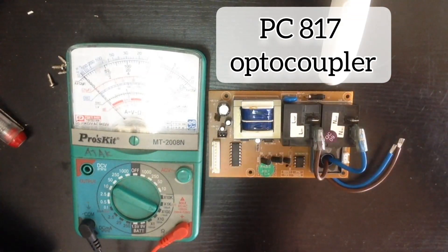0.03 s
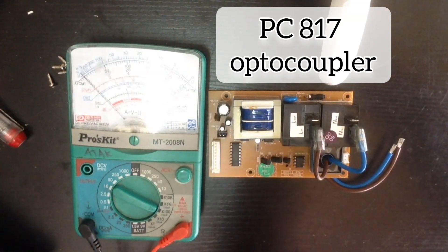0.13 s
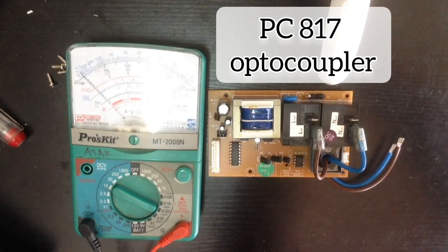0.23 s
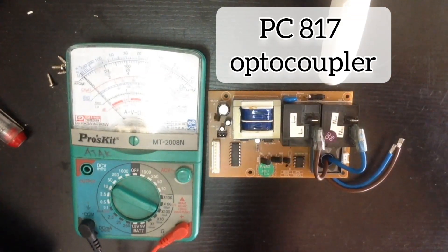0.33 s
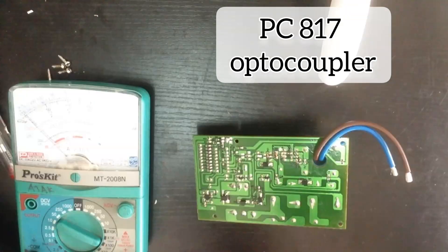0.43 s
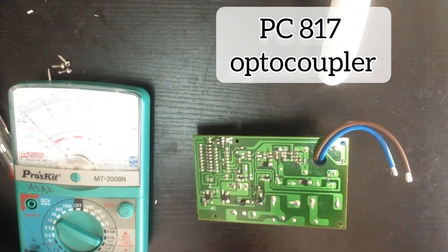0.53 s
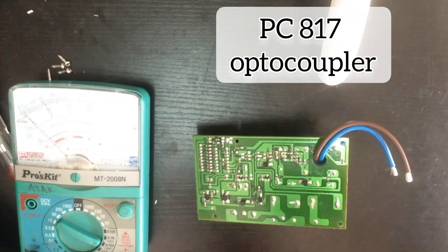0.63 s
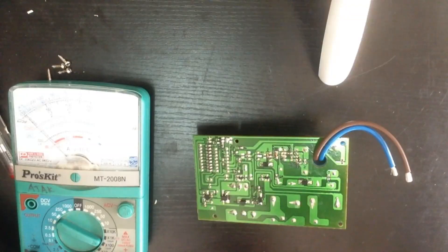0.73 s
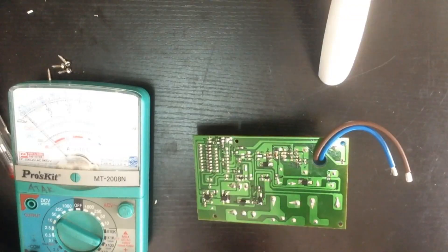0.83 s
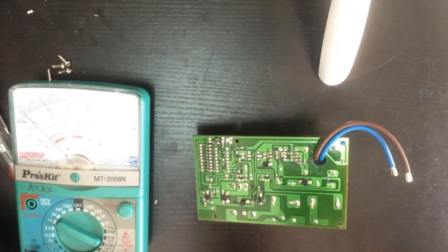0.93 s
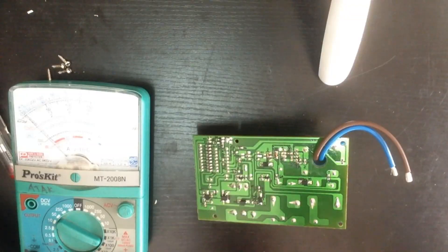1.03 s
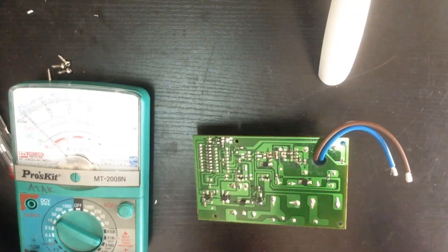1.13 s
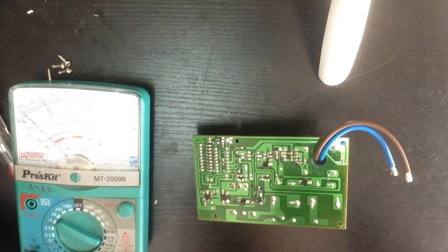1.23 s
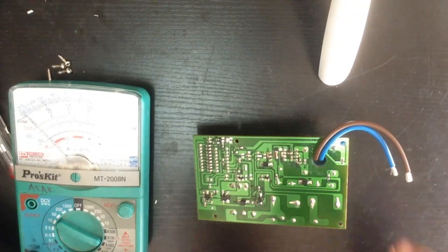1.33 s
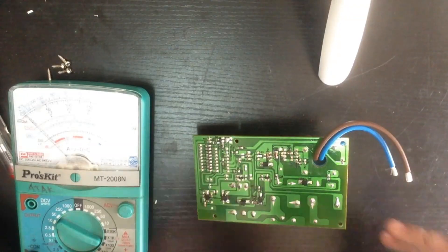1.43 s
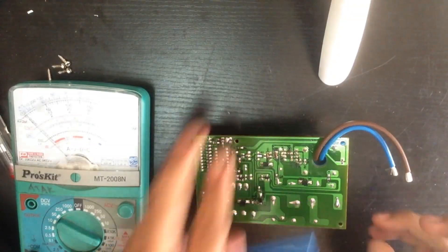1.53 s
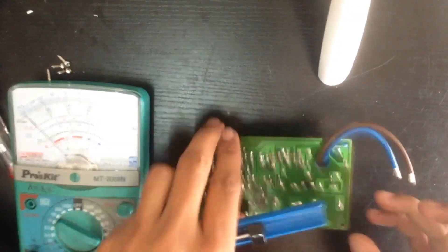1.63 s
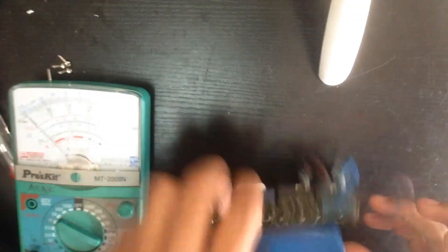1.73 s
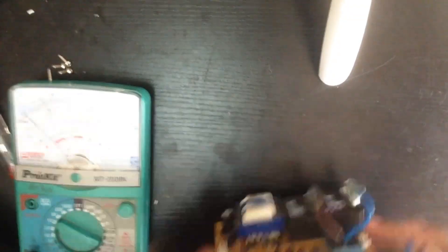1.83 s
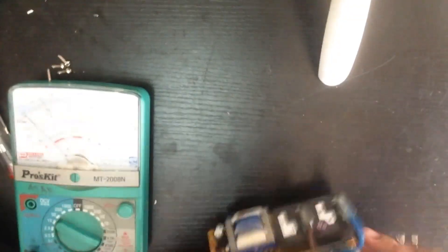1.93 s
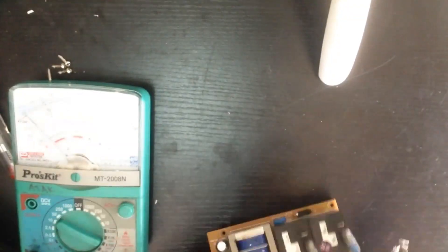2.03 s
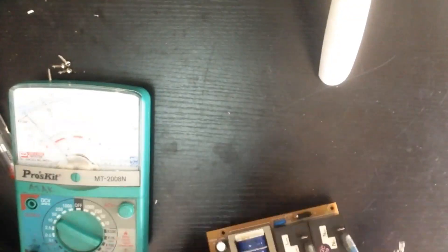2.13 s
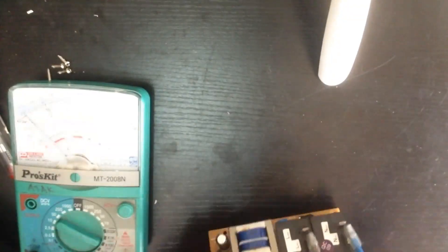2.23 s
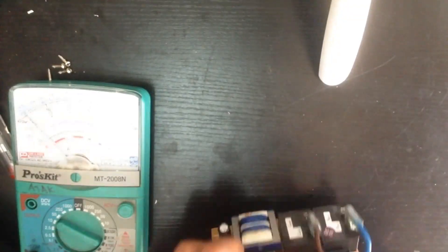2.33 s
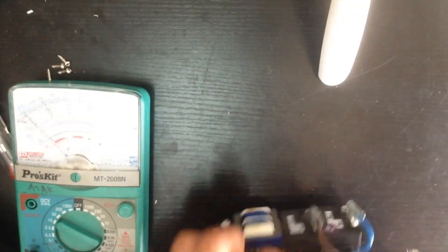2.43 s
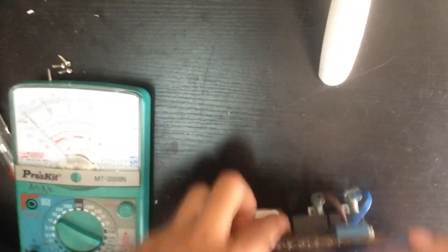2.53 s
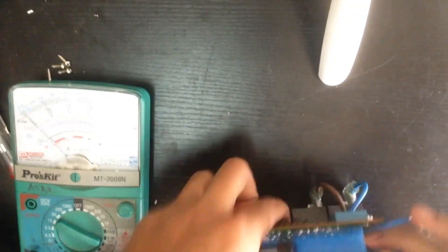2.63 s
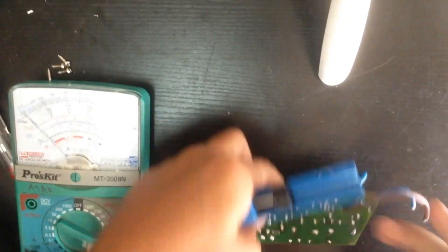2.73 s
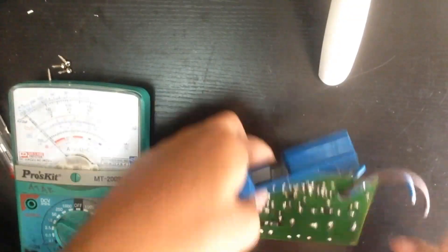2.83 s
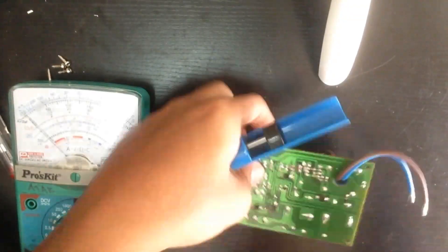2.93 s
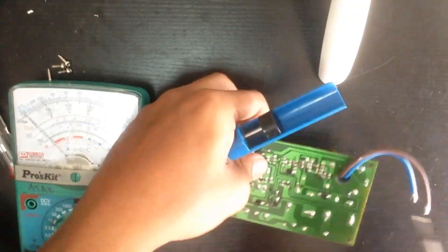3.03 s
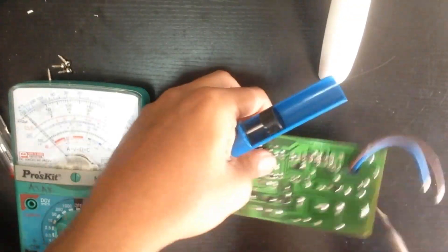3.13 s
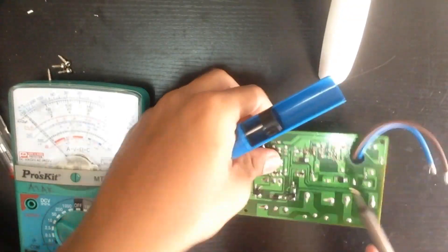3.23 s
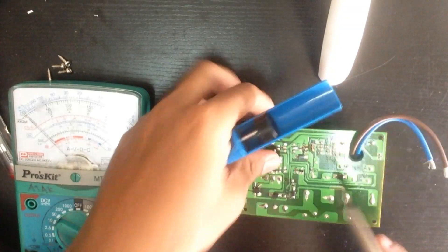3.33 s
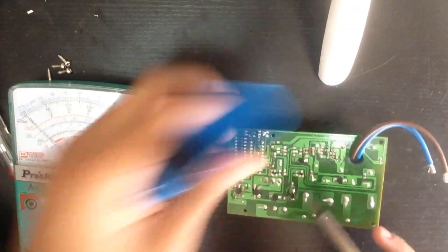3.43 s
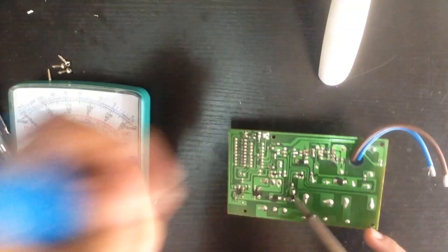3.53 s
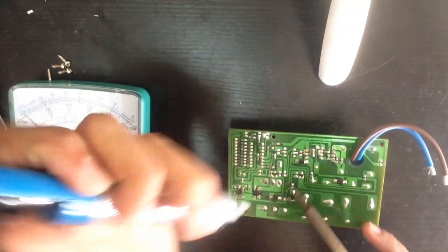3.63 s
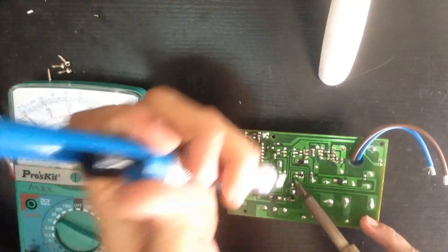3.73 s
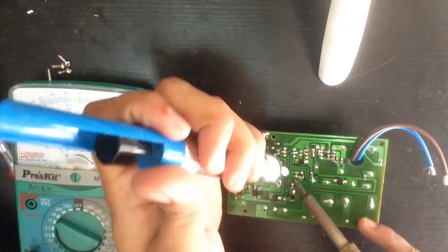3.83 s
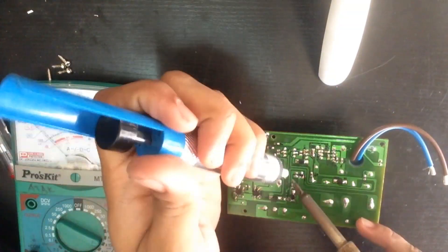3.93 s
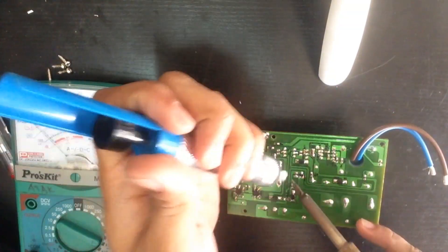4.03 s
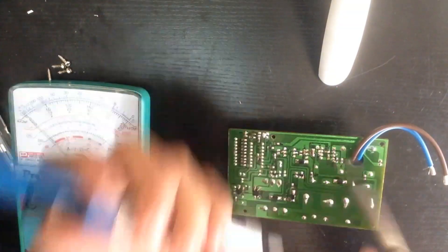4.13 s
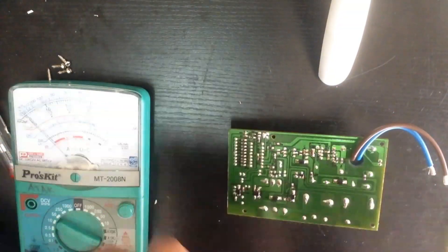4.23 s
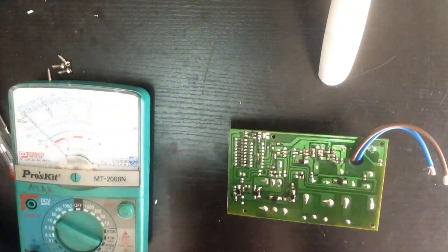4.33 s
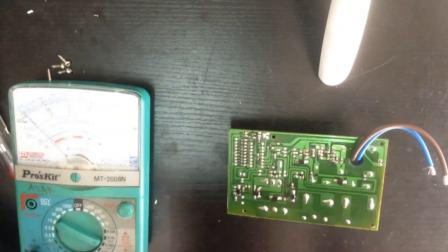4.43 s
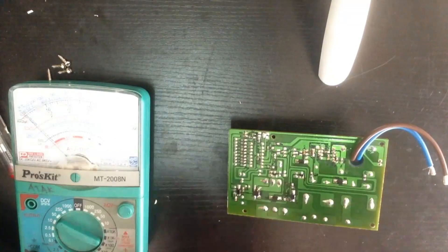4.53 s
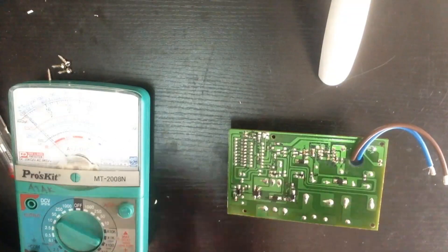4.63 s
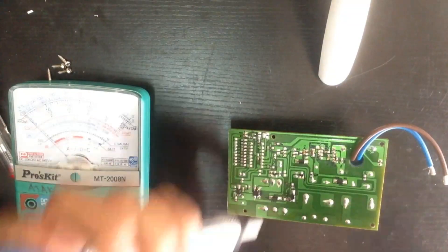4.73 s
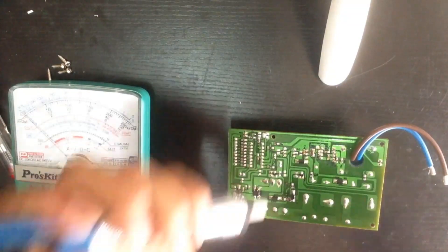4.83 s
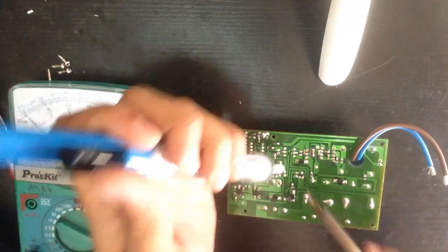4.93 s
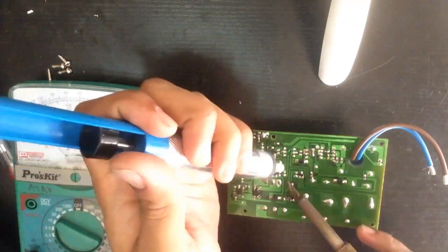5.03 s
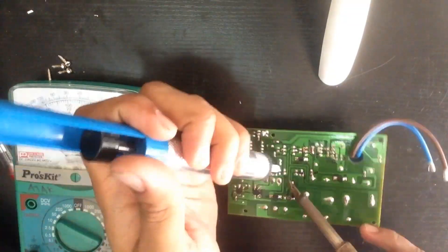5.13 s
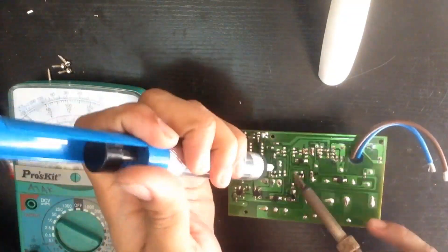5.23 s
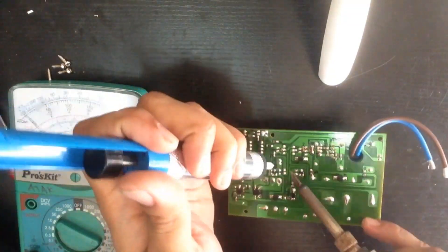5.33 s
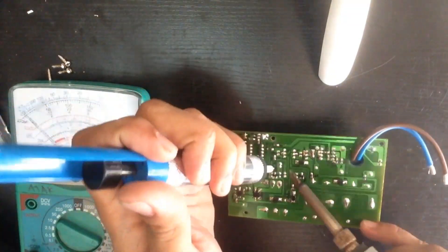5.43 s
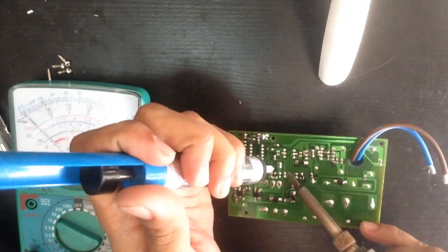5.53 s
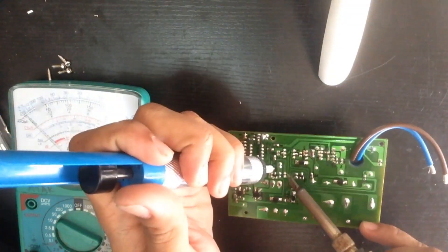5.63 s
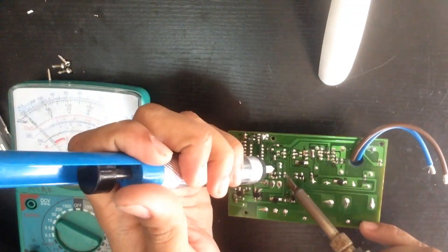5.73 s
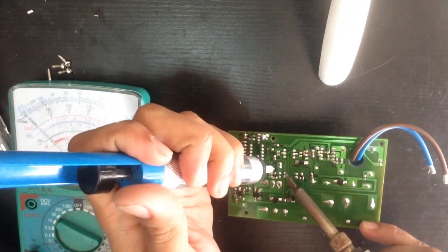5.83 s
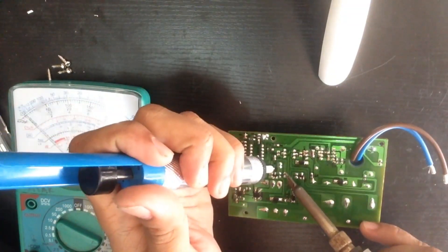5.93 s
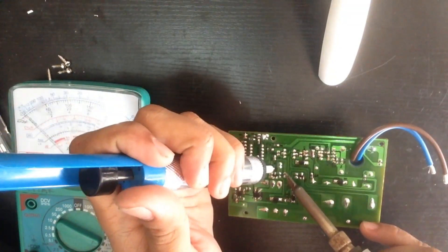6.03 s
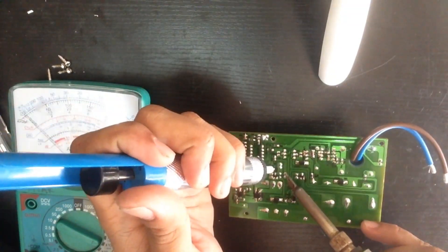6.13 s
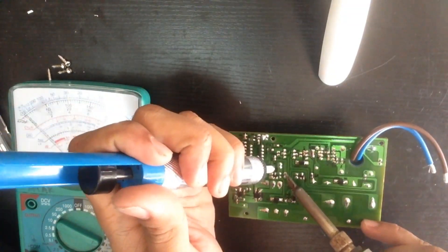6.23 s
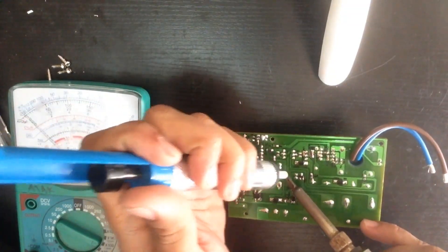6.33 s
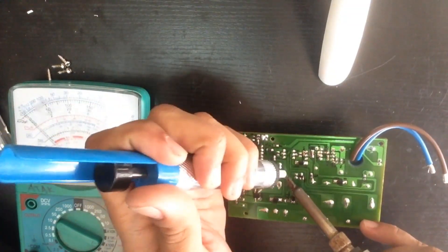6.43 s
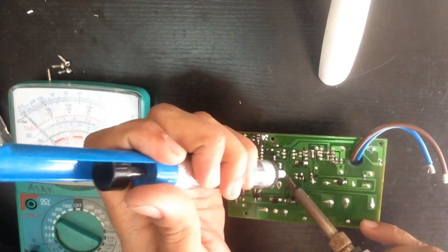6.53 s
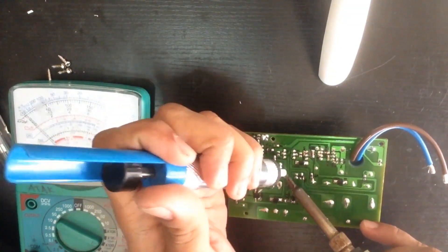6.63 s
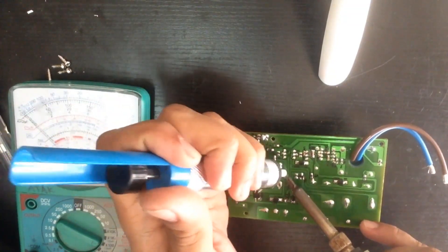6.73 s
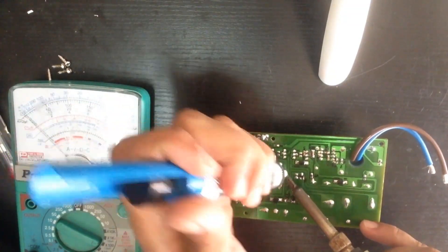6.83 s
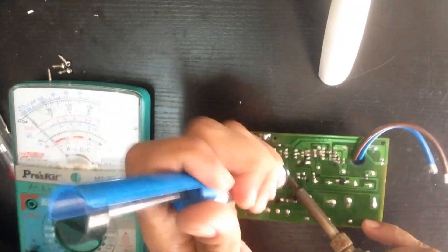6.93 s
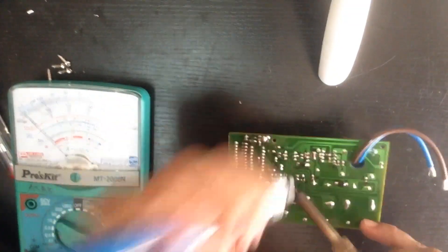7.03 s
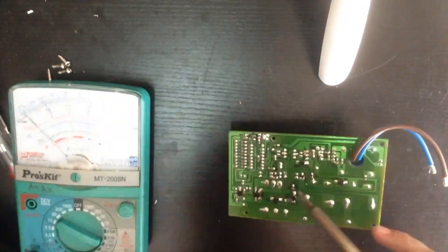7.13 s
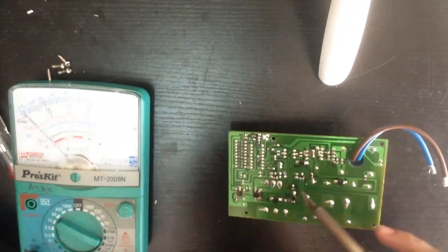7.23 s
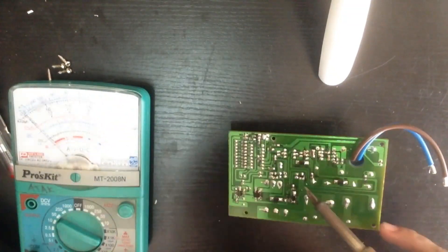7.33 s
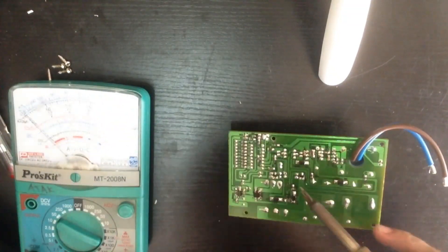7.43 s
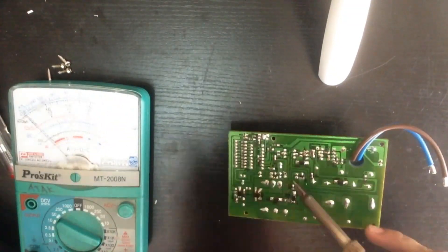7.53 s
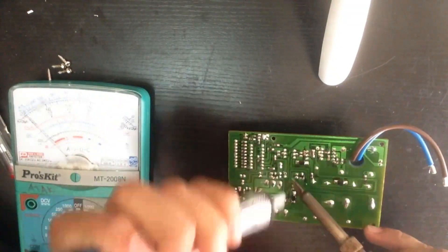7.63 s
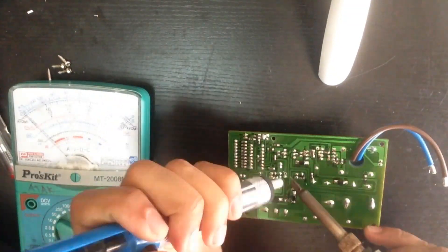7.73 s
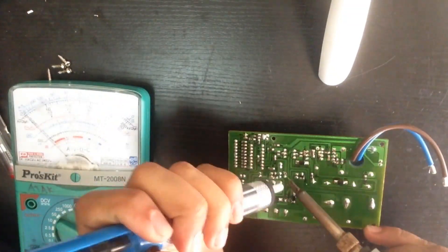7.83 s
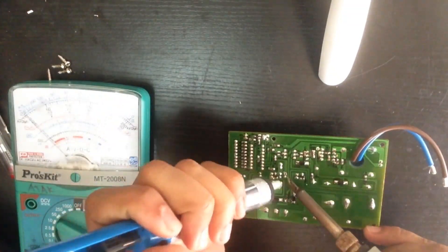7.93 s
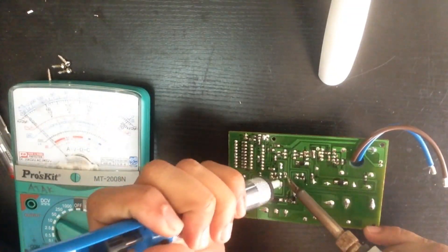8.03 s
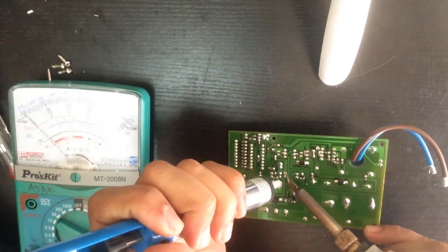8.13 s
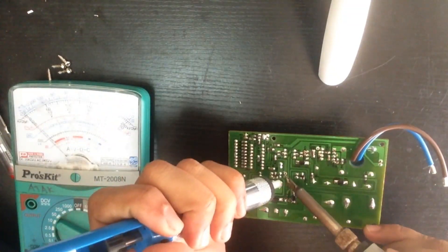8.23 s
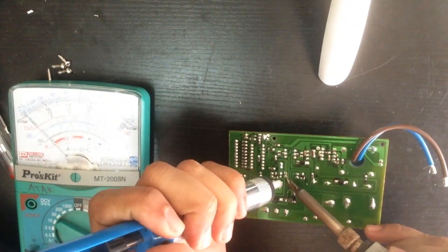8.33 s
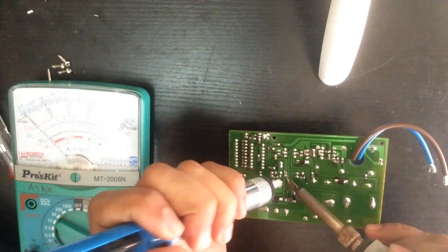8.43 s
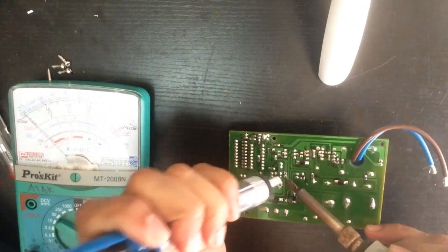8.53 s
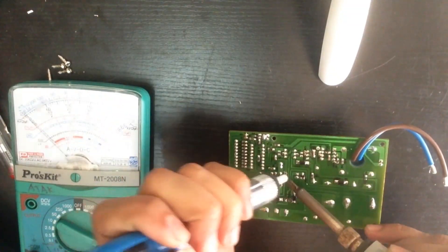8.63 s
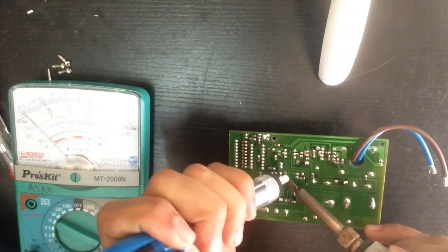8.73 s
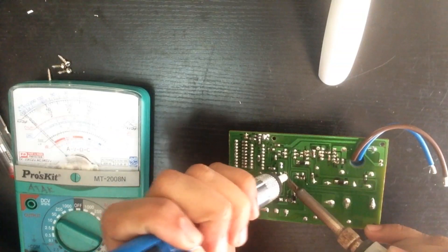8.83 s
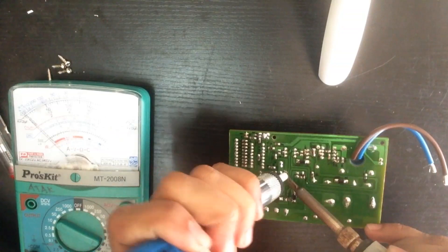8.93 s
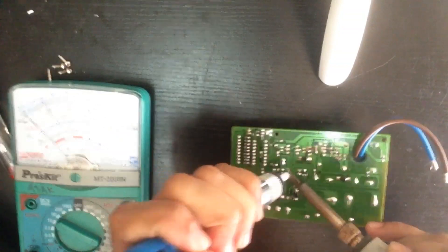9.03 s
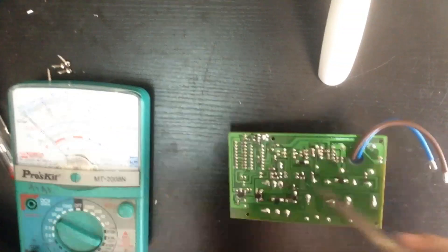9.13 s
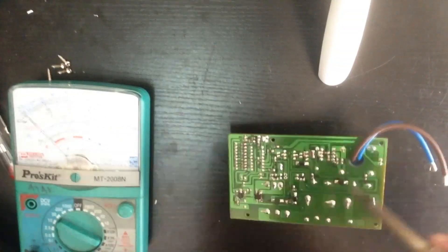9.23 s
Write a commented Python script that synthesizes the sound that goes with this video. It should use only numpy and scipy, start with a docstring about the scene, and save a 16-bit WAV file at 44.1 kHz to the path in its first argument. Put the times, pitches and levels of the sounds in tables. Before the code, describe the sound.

A distant motor revs briefly over low room drone, then silence, plastic pump clicks, wooden knocks of a dragged board, and spring-loaded snaps.

```python
"""A far motor speeds up under low drone and hiss, all goes silent for a moment, then a plastic solder pump clicks.
Place: a wooden workbench in a small room, heard by a close mono microphone. The pump is cocked (its piston hisses down
the barrel, the latch clicks) and fired (an air burst, then a slam); a circuit board is dragged, dropped and tapped.
Shaped noise makes hiss, air and rubbing; short blows ring resonances for clicks and knocks; noise tails make the room.
The background sinks after the loudest snaps."""
import sys
import numpy as np
from scipy import signal
from scipy.fft import rfft, irfft, next_fast_len
from scipy.io import wavfile
from scipy.ndimage import map_coordinates

SR = 44100
rng = np.random.default_rng(int(sys.argv[2]) if len(sys.argv) > 2 else 0)


def digitize_waveform(pressure):
    """Quantize a signal to 16-bit integers and store it at the path in sys.argv[1].

    Rows of a 2-D input are taken as channels; values are limited to [-1, 1].
    """
    field = np.atleast_2d(pressure).T
    bounded = np.clip(field, -1, 1)
    quanta = np.round(bounded * 32767).astype(np.int16)
    wavfile.write(sys.argv[1], SR, quanta)


N = 410130  # length in samples


def amp(db):
    """Decibels to gain."""
    return 10 ** (np.asarray(db) / 20)


def unit(x):
    """Scaled to rms 1."""
    return x / np.sqrt(np.mean(x ** 2) + 1e-20)


def peak(x):
    """Scaled to peak 1."""
    return x / np.max(np.abs(x))


def along(points, hz):
    """Values between (Hz, value) points on a log frequency axis."""
    f, v = np.transpose(points)
    return np.interp(np.log(hz + 1), np.log(f + 1), v)


def curves(rows):
    """One value per sample for each column after the time."""
    s, *cols = np.transpose(rows)
    return [np.interp(np.arange(N) / SR, s, c) for c in cols]


def wobble(rate):
    """A smooth random curve, rate knots a second."""
    knots = rng.standard_normal(int(N * rate / SR) + 4)
    return map_coordinates(knots, [np.arange(N) * rate / SR])


def filtered(x, response):
    """x times a complex response of frequency."""
    m = next_fast_len(len(x) + 8192)
    return irfft(rfft(x, m) * response(np.fft.rfftfreq(m, 1 / SR)), m)[:len(x)]


def coloured(spectrum):
    """Response that follows a (Hz, dB) spectrum."""
    return lambda hz: amp(along(spectrum, hz))


def noise(spectrum, size=N):
    """Coloured noise of rms 1."""
    return unit(filtered(rng.standard_normal(size), coloured(spectrum)))


def body(modes, spread_db=0, pitch_hz=None, focus_db=0):
    """Causal resonances at new random strengths; those far from the pitch lose focus_db an octave."""
    c, w, db = np.transpose(modes)[:, :, None]
    db = db + spread_db * rng.standard_normal(c.shape)
    db = db - focus_db * np.abs(np.log2(c / (pitch_hz or 1)))
    return lambda f: np.sum(amp(db) * 1j * f * w / (c * c - f * f + 1j * f * w), axis=0)


def damped(modes, top_hz):
    """Wood swallows what lies above top_hz."""
    return lambda f: modes(f) / (1 + 1j * f / top_hz) ** 2


def add(track, s, sound):
    """Mix a sound into a track from time s."""
    part = track[round(s * SR):][:len(sound)]
    part += sound[:len(part)]


def slides(rows, attack, t60, arch_db=0):
    """Gain that rises at each start, drifts or arches from one level to the other and dies after the stop."""
    gain = np.zeros(N)
    for start, stop, from_db, to_db in rows:
        t = np.arange(round((stop - start + t60) * SR)) / SR
        db = np.interp(t, [0, stop - start, stop - start + t60], [from_db, to_db, to_db - 60])
        db += arch_db * np.sin(np.pi * np.clip(t / (stop - start), 0, 1))
        add(gain, start, amp(db) * (1 - np.exp(-t / attack)))
    return gain


# How long the small room rings. Each row: frequency in Hz, t60 in s.
ROOM_T60 = [(100, 0.58), (1000, 0.28), (4000, .35), (12000, 0.28)]


def room(x):
    """Each frequency dies at its own speed; every third of a second hears a new noise tail."""
    out, step = np.zeros(len(x)), SR // 3
    for start in range(0, len(x), step):
        hz, t, z = signal.stft(rng.standard_normal(SR // 2), SR, nperseg=256)
        decay = amp(-60 * t / along(ROOM_T60, hz)[:, None])
        tail = signal.istft(z * decay, SR, nperseg=256)[1]
        tail = tail / np.linalg.norm(tail)
        add(out, start / SR + .004, signal.fftconvolve(x[start:start + step], tail))  # walls answer 4 ms late
    return out


# The far motor speeding up. Each row: time in seconds, firing rate in Hz, level in dB.
MOTOR = [(0, 69.14, -56), (.15, 74.45, -53), (.32, 78.6, -54.5), (.33, 79, -120)]
# Its colour at a distance. Each row: frequency in Hz, relative level in dB.
MOTOR_COLOUR = [(59, -31.5), (100, -1), (227, 2), (458, -4), (961, -11), (1210, -21), (2100, -18),
                (2500, -36.5), (3250, -61), (5500, -120)]


def far_motor():
    """Firing pulses with some exhaust noise; distance adds echoes and smears the pulses."""
    rate, level_db = np.array(curves(MOTOR))[:, :SR // 2]
    pulses = np.diff(np.floor(np.cumsum(rate / SR)), prepend=0)
    firing = pulses + 0.032 * rng.standard_normal(len(rate))
    smear = lambda hz: np.exp(-1j * (hz / 260) ** 1.4)
    distant = filtered(firing + room(firing), lambda hz: coloured(MOTOR_COLOUR)(hz) * smear(hz))
    motor = amp(level_db) * unit(distant)
    return np.pad(motor, (0, N - len(motor)))


# Hands and cables brushing. Each row: middle in seconds, half length in seconds, level in dB.
BRUSHES = [(1.72, 0.17, -69.5), (2.003, 0.14, -68), (2.25, 0.039, -70), (2.601, .3, -71.5), (3.0, .05, -64),
           (3.703, .15, -68), (4.0, .12, -70), (4.205, 0.08, -69.5), (4.5, .04, -70), (4.72, .15, -72.5),
           (5.07, 0.091, -65)]


def brushing():
    """Treble noise that swells and fades with each brush, its level fluttering."""
    t = np.arange(N) / SR
    swell = sum(amp(db) * np.exp(-((t - s) / half) ** 2) for s, half, db in BRUSHES)
    rustle = noise([(2500, -40), (5000, -1.5), (9000, -11.5), (11500, -1.5), (14000, -7.5)])
    return swell * amp(1.9 * wobble(47)) * rustle


# The room's low drone. Each row: frequency in Hz, relative level in dB per Hz.
DRONE = [(12, -49.5), (20, -21.5), (65, 4.5), (108, -10), (217, -11), (325, -20), (477, -15.5),
         (652, -21.5), (812, -21), (1600, -39), (2080, -63), (3520, -120)]
# The smooth hiss over it. Each row: frequency in Hz, relative level in dB per Hz.
HISS = [(530, -26), (900, -1), (1190, -11.5), (1470, -0.5), (1660, -3.5), (2150, -2.5), (4160, -6.5),
        (5440, -14), (13000, -20.5)]
# Wavering hums in the drone. Each row: frequency in Hz, width in Hz, relative strength in dB.
HUM = [(66.5, 22, -0.5), (131, 9, -2.5), (440, 3.6, -12)]
# The background sinks after the loudest snaps. Each row: start in seconds, depth setting in dB,
# time to win back two thirds in seconds.
DIPS = [(1.03, 12, .35), (7.0, 14, 0.77), (7.48, 1, 0.66), (9.07, 24, .4)]
SINK_S = 0.046  # time constant of sinking
# The moment when nothing sounds: start and stop in seconds.
SILENCE = (.323, .39)
DRONE_DB, HISS_DB = -54.5, -68.5  # levels before dips and wavering
OPENING_DRONE_DB, OPENING_HISS_DB = -57.5, -71.5  # both are fainter before the silence
LUMPS_DB = 1.4  # wavering of the drone


def background():
    """Lumpy low drone with hums, smooth hiss, a far motor, brushing hands."""
    t = np.arange(N) / SR
    dip_db = np.zeros(N)
    for s, depth_db, back in DIPS:
        since = np.maximum(t - s, 0)
        dip_db += depth_db * (1 - np.exp(-since / SINK_S)) * np.exp(-since / back)
    opening = t < SILENCE[0]
    drone_db = np.where(opening, OPENING_DRONE_DB, DRONE_DB) - dip_db
    hiss_db = np.where(opening, OPENING_HISS_DB, HISS_DB) - dip_db
    hum = amp(-3.5) * unit(filtered(rng.standard_normal(N), body(HUM)))
    drone = amp(drone_db + LUMPS_DB * wobble(6.3)) * (noise(DRONE) + hum)
    hiss = amp(hiss_db + 0.57 * wobble(12)) * noise(HISS)
    return drone + hiss + far_motor() + brushing()


# Blows on the bench, close by. Each row: time in seconds, level in dB, pitch in Hz,
# deep thud in dB and sharp edge in dB, both relative to the level.
KNOCKS = [(1.708, -35.5, 490, -18, -10), (1.743, -33.5, 284, -17, -27), (1.797, -9.5, 550, -10.5, -11.5),
          (1.81, -11.5, 680, -18, -25), (1.833, -18.5, 500, -27, -21), (1.863, -16.5, 504, -34, -13),
          (1.877, -17, 610, -24, -18), (1.901, -41, 493, -19, -8), (1.933, -30.5, 538, -18, -14),
          (1.958, -29.5, 384, -20, -7.5), (1.993, -45, 522, -24, 4), (2.006, -46, 253, -24, -15),
          (2.116, -29.5, 266, -21, -11.5), (2.129, -40.5, 371, -13, -15), (2.5, -27, 497, -15, -14),
          (2.567, -12, 560, -22.5, -20), (2.599, -27.5, 690, -16, -34), (2.659, -35.5, 260, -11, -31),
          (3.01, -11, 494, -15, -19), (3.137, -26, 445, -41, -47), (3.218, -36.5, 520, -19, -21),
          (3.28, -18.5, 480, -13.5, -19.5), (3.289, -30.5, 510, -24, -30), (3.426, -19, 290, -18.5, -25.5),
          (3.481, -31.5, 226, -6, -33), (3.543, -25.5, 284, -15, -31), (3.612, -37.5, 265, -11, -37),
          (4.982, -54, 221, -21, -13), (5.297, -30.5, 262, -12, -17), (5.536, -31.5, 460, -33.5, -29),
          (6.208, -38, 288, -11.5, -15.5), (6.308, -36, 480, -24, -37), (7.092, -29, 510, -33, -16),
          (7.153, -39.5, 502, -37.5, -24), (9.157, -30.5, 490, -18, -13), (9.201, -34.5, 453, -15.5, -16),
          (9.28, -36, 465, -25, -24)]
# The wooden top. Each row: resonance in Hz, width in Hz, relative strength in dB.
BENCH = [(275, 31, 9.5), (314, 29, -3), (406, 31, 5), (494, 70, 11), (605, 120, -15), (689.4, 12, 4.5),
         (769, 260, 3), (1013, 27, -14), (1230, 190, -8), (1510, 465, -19), (2100, 400, -42)]
# The legs below. Each row: resonance in Hz, width in Hz, relative strength in dB.
THUD = [(72.6, 10, -33), (135.1, 10, 12), (210, 28, -10.5)]
# The board's sharp edge. Each row: frequency in Hz, relative level in dB per Hz.
EDGE = [(700, -20), (1300, -1), (2500, -0.5), (4500, 0.5), (7000, -7.5), (12000, -7.5)]
CLATTER_T60 = 0.061  # s
DULLING_DB = 6  # treble of the edge lost an octave above 2.5 kHz for each 20 dB that it is softer
SHAKE_DB, SHAKE_T60 = -26.5, 0.18  # shudder relative to the blow's level; its decay in s


def knocks():
    """Each blow rings the top, thuds through the legs, cracks at the board's edge and shudders the bench."""
    out, t = np.zeros(N), np.arange(SR // 4) / SR
    for s, db, pitch_hz, thud_db, edge_db in KNOCKS:
        # softer contacts last longer and sound lower
        contact = np.sin(np.pi * np.clip((t - .0015) * pitch_hz / 0.64, 0, 1)) ** 2
        # loose parts shake on
        clatter = amp(-60 * t / CLATTER_T60) * rng.standard_normal(len(t)) * (1 - np.exp(-t / 0.003))
        loose = body(BENCH, spread_db=8.5, pitch_hz=pitch_hz, focus_db=11.5)
        add(out, s, amp(db - 7.5) * peak(filtered(clatter, damped(loose, top_hz=1546))))
        top = body(BENCH, spread_db=3.5, pitch_hz=pitch_hz, focus_db=6.5)
        add(out, s, amp(db) * peak(filtered(contact, damped(top, top_hz=1395))))
        add(out, s, amp(db + thud_db) * peak(filtered(contact, body(THUD, spread_db=6.5))))
        tilt_db = DULLING_DB * edge_db / 20
        edge = [(hz, level_db + tilt_db * max(np.log2(hz / 2500), 0)) for hz, level_db in EDGE]
        crack = peak(noise(edge, size=len(t)))
        add(out, s, amp(db + edge_db + 11.0 - 60 * t / 0.048) * (1 - np.exp(-t / .0025)) * crack)
    shudder = [(s, s + 0.0063, db + SHAKE_DB, db + SHAKE_DB) for s, db, *_ in KNOCKS]
    return out + slides(shudder, 0.013, SHAKE_T60) * noise([(25, -19), (70, 1), (110, 2), (250, -37.5)])


# The board dragged over the wood. Each row: start and stop in seconds, level at the start and stop in dB.
DRAG = [(1.8, 2.05, -31.5, -61), (2.468, 2.575, -39.5, -30.5)]
# The hiss of its edge. Each row: start and stop in seconds, level at the start and stop in dB.
SCRAPE = [(1.79, 2.05, -40.5, -70), (2.468, 2.585, -44, -45)]
# A faint rub near 900 Hz. Each row: start and stop in seconds, level at the start and stop in dB.
RUB = [(2.68, 2.9, -62, -63)]
GRIP_S, LIFT_T60 = 0.014, 0.055  # rise time constant and decay of a drag


def dragging():
    """Friction as grainy noise: it rings the wood, hisses at the board's edge and rubs faintly."""
    grit = rng.standard_normal(4 * SR) * amp(2.5 * wobble(220) + wobble(60))[:4 * SR]
    rain = lambda response: np.resize(unit(filtered(grit, response)), N)  # the four seconds of grit repeat
    wood = rain(damped(body(BENCH + THUD[1:]), top_hz=1488))
    out = slides(DRAG, GRIP_S, LIFT_T60) * amp(3 * wobble(40)) * wood
    out += slides(SCRAPE, GRIP_S, LIFT_T60) * rain(coloured(EDGE))
    out += slides(RUB, 0.052, 0.95) * rain(body([(926, 160, -0.5), (1123, 150, -16)]))
    return out


# A short wooden creak: start in seconds, rise in seconds, level in dB.
CREAK = (4.924, .01, -44)
# Its tones. Each row: frequency in Hz, relative level in dB, t60 in s.
CREAK_TONES = [(447, 1.5, 0.16), (615, 4, 0.1), (810, -1, 0.13), (1337, 1.5, 0.14), (1300, -13.5, .12),
               (2520, -9.5, 0.19), (2950, -16, .15)]


def creak():
    """A joint slips unevenly, about 85 times a second, and its jerks modulate dying tones over a little noise."""
    out, t = np.zeros(N), np.arange(SR // 4) / SR
    s, rise, db = CREAK
    jitter = noise([(20, -7), (150, 4), (300, -60)], size=len(t))
    slips = 1 + .5 * np.cos(2 * np.pi * 85 * (t - rise)) + 0.43 * jitter
    tones = np.zeros(len(t))
    for hz, level_db, t60 in CREAK_TONES:
        tones += amp(level_db - 60 * t / t60) * np.sin(2 * np.pi * (hz * t + rng.random()))
    breath = 0.17 * amp(-60 * t / 0.41) * noise(EDGE, size=len(t))
    add(out, s, amp(db) * np.clip(t / rise, 0, 1) * (tones * slips + breath))
    return out


# The piston slides along the barrel, up to the latch and then back onto it. Each row: start and stop in
# seconds, level at the start and stop in dB, whistle relative to them in dB.
STROKES = [(0.596, 0.665, -64.5, -56.5, -12), (0.664, 0.795, -40.5, -46, -10.5),
           (0.809, .95, -49, -56, -10.5), (1.238, 1.344, -42.5, -48, -8), (1.33, 1.454, -39.5, -62.5, -14),
           (7.348, 7.466, -48.5, -43.5, -5.5), (7.483, 7.565, -60.5, -64, -7.5)]
# The rubbing seal. Each row: frequency in Hz, relative level in dB per Hz.
SEAL = [(240, -45.5), (400, -10), (528, -5), (610, -7), (737, -14.5), (1380, -26), (2510, -4), (3560, 0.5),
        (5750, -2.5), (8040, -3), (8770, -1), (12300, -9), (13000, -16)]
# The barrel's air column. Each row: resonance in Hz, width in Hz, relative strength in dB.
WHISTLE = [(620, 120, -6.5), (3370, 110, -4), (4160, 280, -3.5), (7970, 200, 0)]
PUSH_S, HALT_T60 = 0.019, .03  # the hand gathers speed; the hiss dies when it stops
ARCH_DB = 3  # a stroke is fastest halfway


def piston_strokes():
    """The seal rubs as noise of shifting colour while air whistles in the barrel; the seal grips and slips."""
    rub = slides([row[:4] for row in STROKES], PUSH_S, HALT_T60, arch_db=ARCH_DB)
    whistle_rows = [(a, b, c + db, d + db) for a, b, c, d, db in STROKES]
    air = slides(whistle_rows, PUSH_S, HALT_T60, arch_db=ARCH_DB)
    seal = noise(SEAL)
    dull = filtered(seal, lambda hz: 1 / (1 + (hz / 4800) ** 4))
    bright = seal - dull
    rub *= amp(1.5 * wobble(30)) * dull + amp(1.7 * wobble(30)) * bright  # the colour shifts
    whistle = unit(filtered(rng.standard_normal(N), body(WHISTLE)))
    return amp(1.8 * wobble(140)) * (rub + air * whistle)


# The spring let go. Each row: start and stop in seconds, air at the start and stop in dB, air t60 in s,
# rattle in dB, suction in dB, slam in dB, slam length as a factor, rumble in dB.
FIRINGS = [(0.997, 1.015, -35, -26, 0.25, -36.5, -38, -30, 1.05, -34.5),
           (6.971, 6.9842, -34, -13, 0.044, -18.5, -35, -5.5, 0.68, -29),
           (9.044, 9.0603, -35.5, -12.5, 0.016, -15.5, -16, -6.5, 1.16, -23.5)]
# The burst of air. Each row: frequency in Hz, relative level in dB per Hz.
BURST = [(530, -26.5), (900, -6), (1330, -9.5), (2910, -1), (3290, 0.5), (6290, -4), (7520, -10),
         (11600, -4.5), (13000, -11.5)]
BANG_DB = 18.5  # what the walls get of a firing: one bang, over the air's last level
PULSE = signal.unit_impulse(SR // 10, 24)


def firings():
    """Air bursts out as the piston flies, then it slams home; returns the near sound and that sent to the walls."""
    out, walls, t = np.zeros(N), np.zeros(N), np.arange(SR // 4) / SR
    rumble = [(60, -31), (200, -2.5), (600, -2.0), (1000, -7.0), (1800, -33.5)]
    for (start, stop, from_db, to_db, t60, rattle_db, suction_db, slam_db, slam_length,
         rumble_db) in FIRINGS:
        travel = t / (stop - start)
        flying = travel < 1
        rising_db = from_db + (to_db - from_db) * travel
        dying_db = to_db - 5.5 - 60 * (t - stop + start) / t60
        swell = amp(np.where(flying, rising_db, dying_db))
        steps = np.repeat(rng.standard_normal(len(t)), 30)[:len(t)]
        chatter = amp(4.1 * flying * steps)  # the spring chatters on the wall
        add(out, start, swell * chatter * noise(BURST, size=len(t)))
        add(walls, stop, amp(to_db + BANG_DB) * peak(filtered(PULSE, coloured(BURST))))
        low = noise(rumble, size=len(t))
        add(out, start, amp(rattle_db) * flying * travel ** 2 * low)
        # suction: one slow swing of pressure
        add(out, start, amp(suction_db) * np.sin(np.pi * np.clip(travel, 0, 1) ** 1.4) ** 2)
        # the piston hits its stop: push, then a longer pull (widths in samples)
        u = t - 1 / 250
        fade = np.exp(-(u / slam_length * SR / np.where(u < 0, 24, 44)) ** 2)
        add(out, stop - 1 / 250, -amp(slam_db) * np.tanh(u / 0.00035) * fade)
        # the hand shakes the board
        add(out, stop, amp(rumble_db - 60 * t / 0.1) * low)
        add(walls, stop, amp(rumble_db - 60 * t / 0.046) * low)
    return out, walls


# Hard contacts on the pump and tools, close to the microphone. Each row: time in seconds, level in dB,
# pitch in Hz, brightness in dB and hollow knock in dB (both relative to the level), rattle t60 in s.
CLICKS = [(0.59, -36.5, 4010, -3, -32, 0.046), (0.616, -46.5, 4820, 0, -5, .02),
          (0.7839, -24.5, 4330, -1, -12, 0.052), (0.8044, -2, 4300, -7.5, -19.5, 0.026),
          (0.8153, -21, 4840, -3.5, -41, 0.053), (0.8732, -34.5, 3940, -8.5, -20, .015),
          (0.9044, -20, 3790, -3, -11, 0.034), (0.93, -33.5, 3700, -8, -13, 0.045),
          (0.9868, -32.5, 3240, -4.5, -25, .06), (1.0084, -5.5, 3536, -2, -25.5, .03),
          (1.0104, 0, 3102, -1.5, -23, .03), (1.2216, -33.5, 4790, -8, -36, 0.053),
          (1.2411, -28.5, 3280, -22, -30, 0.12), (1.3517, -13, 3150, -3, -21.5, .035),
          (1.363, -15.5, 4140, -18, -29, 0.036), (1.4531, -26.5, 4560, 9.5, -25, 0.023),
          (1.461, -15.5, 3950, -6, -12, .04), (1.492, -27.5, 3700, 0.5, -26, 0.056),
          (1.7996, -23, 6300, 10, -19, 0.045), (2.1838, -34, 4940, -2, -20, .02),
          (2.2217, -48, 4740, -12, 2, .02), (2.2427, -37, 4870, -14, -10, 0.055),
          (2.381, -48.5, 3040, -2, -1, .02), (2.704, -46.5, 2730, 5, -20, .02),
          (4.4893, -41.5, 3820, -4, -27, .02), (4.754, -43, 5300, 0.5, -3, 0.027),
          (6.501, -48.5, 5150, -2, -20, .02), (6.9476, -30, 5500, 0, -15, .025),
          (6.956, -23, 3480, -7.5, -27, 0.034), (6.9789, -7, 3370, 3.5, -4.5, 0.0092),
          (7.123, -27, 5260, 7.5, -15, 0.022), (7.47, 1.5, 4440, -4.5, -23.5, 0.026),
          (7.4814, -26.5, 4130, -1, -23, .02), (7.5634, -12.5, 3970, 1, -8, 0.027),
          (8.048, -40, 2350, -29, -8, 0.029), (8.8366, -22.5, 3140, -0.5, -36.5, 0.051),
          (8.8443, -22.5, 5250, -12.5, -24.5, 0.058), (9.0042, -19, 3600, 3, -13.5, .022),
          (9.0483, -21.5, 6150, 10.5, -5, .016), (9.0525, -6, 4400, -16, 5, 0.044),
          (9.176, -46, 3610, 9, -15, 0.022), (9.191, -28, 5190, 1.5, -33, 0.024)]
# Hollow of the pump. Each row: resonance in Hz, width in Hz, relative strength in dB.
BARREL = [(560, 200, 0), (900, 250, -5)]
# Its plastic shell. Each row: resonance in Hz, width in Hz, relative strength in dB.
PLASTIC = [(2300, 350, -6), (3100, 330, -1), (3700, 300, -3), (4230, 190, 0), (5150, 420, -3),
           (6300, 600, -3)]
# Thin edges. Each row: resonance in Hz, width in Hz, relative strength in dB.
SNAP = [(6760, 3000, 1.5), (7740, 900, -1), (8750, 690, -3), (10500, 1400, -4)]


def clicks():
    """A blow and its rattle ring plastic, barrel and thin edges; returns the near sound and that sent to the walls."""
    out, walls, t = np.zeros(N), np.zeros(N), np.arange(SR // 10) / SR
    for s, db, pitch_hz, bright_db, knock_db, t60 in CLICKS:
        rattle = amp(-60 * t / np.clip(t60, .003, .2)) * rng.standard_normal(len(t))
        blow = .11 * rattle * (1 - np.exp(-t / .0006))
        blow[24] += 1
        snap = amp(db - 1.0 + bright_db) * peak(filtered(blow, body(SNAP, spread_db=-2)))
        hollow = amp(db + knock_db) * peak(filtered(blow, body(BARREL, spread_db=5.5)))
        # each contact favours the modes near its pitch
        shell = body(PLASTIC, spread_db=1, pitch_hz=pitch_hz, focus_db=40)
        ring = amp(db - 4.5) * peak(filtered(blow, shell))
        add(out, s, snap + hollow + ring)
        # summed over all directions the modes blur
        add(walls, s, amp(db + 1.5) * peak(filtered(PULSE, coloured(SEAL))))
    return out, walls


def scene():
    """Pump and bench in the room, alike in both channels."""
    wood = knocks() + dragging() + creak()
    strokes = piston_strokes()
    shots, shot_walls = firings()
    contacts, contact_walls = clicks()
    tool = strokes + shots + contacts
    walls = strokes + shot_walls + contact_walls
    mono = tool + wood + room(amp(-17.5) * walls + amp(-13) * wood) + background()
    t = np.arange(N) / SR
    mono = mono * ((t < SILENCE[0]) | (t > SILENCE[1]))
    return np.array([mono, mono])


TOP_HZ = 12800  # band limit


def record(dry):
    """The microphone loses the deepest bass, the input rounds off peaks, nothing stays above the band limit."""
    x = np.array([filtered(c, lambda hz: (1j * hz / (1j * hz + 30)) ** 2) for c in dry])
    x = x / (1 + np.abs(x / .75) ** 4) ** (1 / 4)
    band = lambda hz: np.sin(np.pi / 2 * np.clip((TOP_HZ - hz) / 300, 0, 1)) ** 2
    return np.array([filtered(c, band) for c in x])


dry = scene()
out = record(dry)
digitize_waveform(out)
```